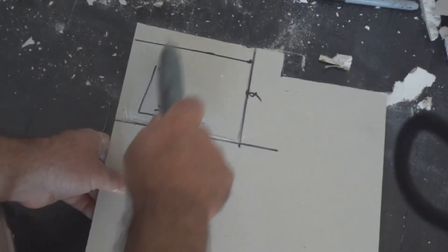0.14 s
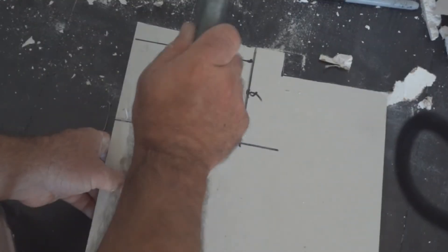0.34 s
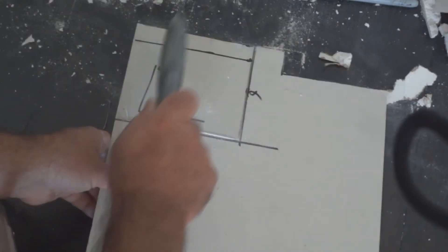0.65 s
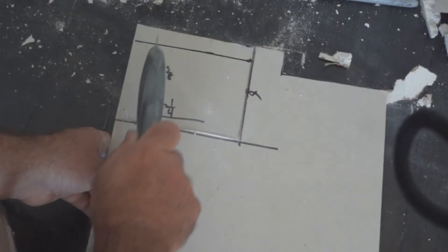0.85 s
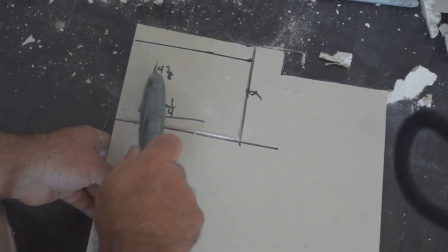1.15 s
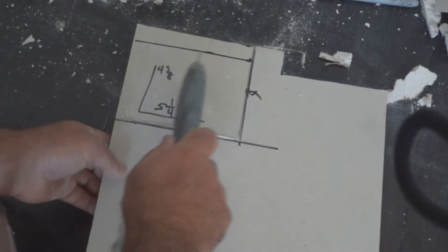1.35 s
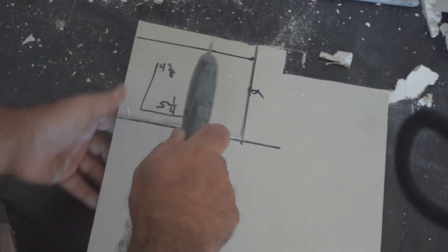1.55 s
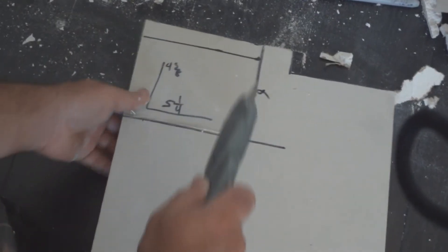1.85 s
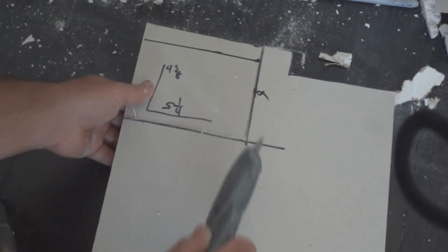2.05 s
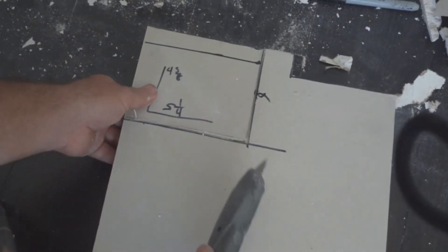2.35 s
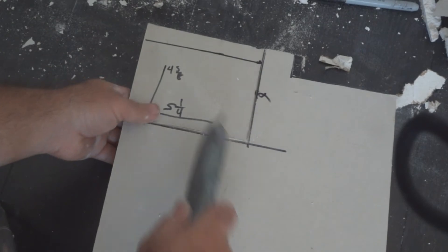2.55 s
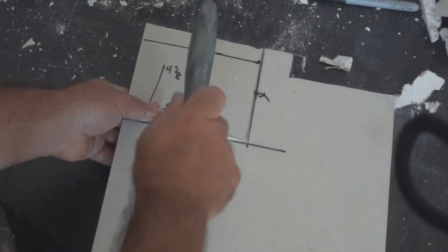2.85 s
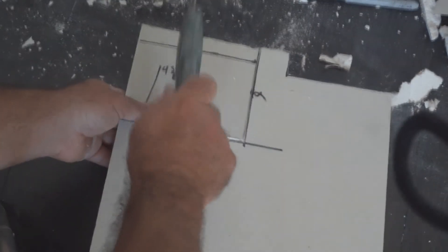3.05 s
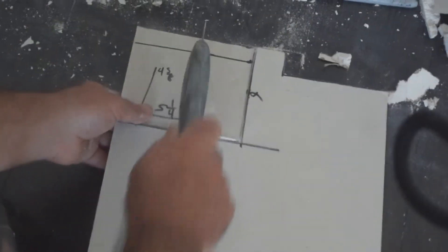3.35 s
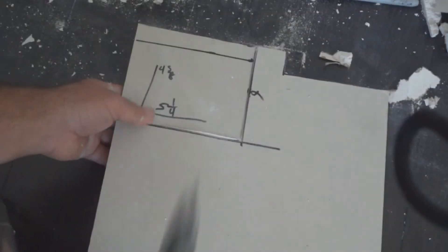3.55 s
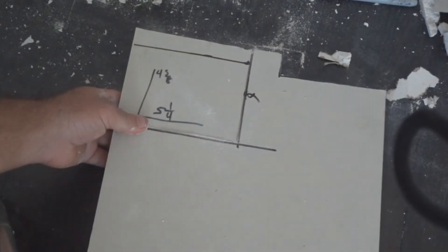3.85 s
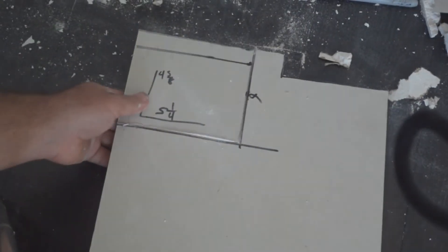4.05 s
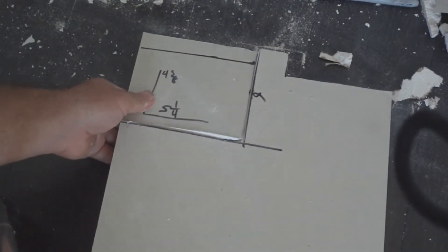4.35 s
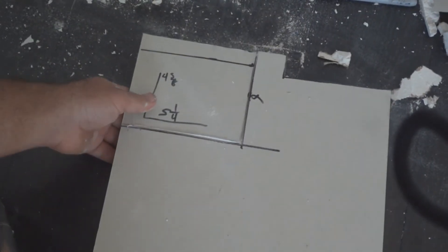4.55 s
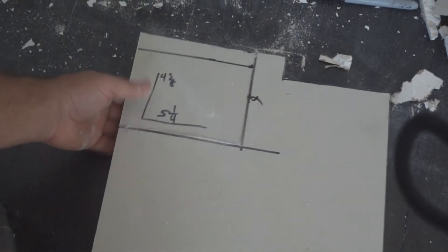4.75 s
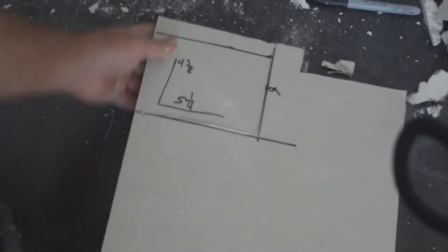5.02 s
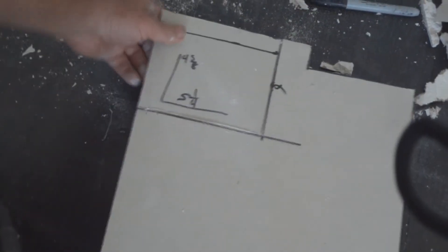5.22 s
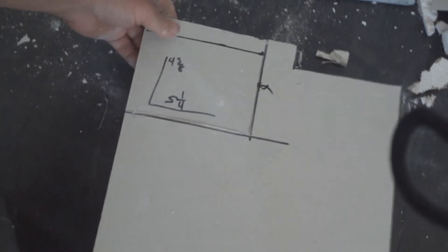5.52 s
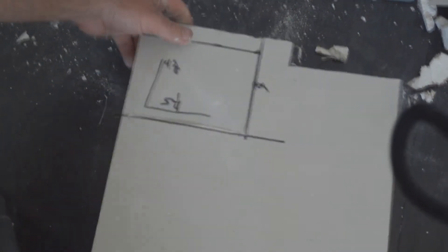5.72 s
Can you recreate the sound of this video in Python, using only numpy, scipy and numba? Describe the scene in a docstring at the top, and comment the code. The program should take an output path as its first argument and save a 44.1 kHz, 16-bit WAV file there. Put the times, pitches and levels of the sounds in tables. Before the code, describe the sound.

A knife handle knocks on a scored plasterboard sheet in a bare, echoing workshop. The ring of one blow is already fading as another lands. Faint grit ticks, skin brushing paper and small creaks from the grip follow, then two more sharp knocks close together. A hand slides over the sheet and bends it, giving soft bumps and a quick cluster of cracks. The handling sounds are close and dry, while the knocks fill the room.

```python
"""Rapping and cracking plasterboard

A knife handle raps a scored plasterboard sheet four times in a bare, echoing workshop, the first blow
landing just before the start. Grit ticks, skin brushes the paper and the knife creaks in the grip; then
a hand slides over the sheet and bends it until it knocks and cracks. A limiter squashes every blow and
lets the echo swell up behind it."""
import sys
import numpy as np
from scipy import signal
from scipy.fft import rfft, irfft, next_fast_len
from scipy.io import wavfile
from scipy.ndimage import uniform_filter1d, minimum_filter1d
from numba import njit

SR = 44100
rng = np.random.default_rng(int(sys.argv[2]) if len(sys.argv) > 2 else 0)


def to_wav(s):
    """Save 16-bit WAV."""
    ch = np.atleast_2d(s).T  # columns
    pcm = np.round(np.clip(ch, -1, 1) * 32767)  # PCM
    wavfile.write(sys.argv[1], SR, pcm.astype(np.int16))


N = 259308

# Handle blows. Each row: start in seconds, strength in dB, low, bite and bright lifts in dB, thud and
# direct sound in dB against the strength, pitch factor, landing spot (-1 on the nodes, 1 between them).
HANDLE_RAPS = [(-.12, 14, 7, -5, 3.5, -31.5, 12, 0.96, 0.9),
               (.5545, 12, 0.5, 0.5, -2.5, -32.5, 1, 0.97, -0.13),
               (3.0117, 19.5, -8, -1.5, 2, -39, 4, 0.97, 0.98),
               (3.336, 13.5, 8, -7.5, 7, -32, 17.5, 1, 0.82)]
# The ring of the rapped sheet. Each row: pitch in Hz, width in Hz, level in dB.
RAPPED_MODES = [(404, 86, -12.5), (463, 250, -12.5), (698, 230, -7.5), (971, 120, 0.5), (1144.6, 69, -1),
                (1347, 330, -7), (1822, 194, -3), (2250, 900, -12), (3060, 710, -9.5), (3600, 500, -10.5),
                (4550, 870, -15.5), (5347, 320, -17.5), (6384, 380, -21.5), (8400, 4200, -26.5),
                (8650, 440, -23), (9310, 380, -24.5), (11200, 8200, -22.5), (13430, 2000, -32.5)]
# Modes that follow the landing spot. Each row: pitch in Hz, lift between the nodes in dB.
LANDING_MODES = [(686, 6.5), (1128, -2), (1362, -2), (1812, -2.5), (2336, 4), (3564, -0.6), (5300, -0.8),
                 (6370, 2), (9310, 6.5)]
# Knocks and cracks of the bent sheet. Each row: as for the handle blows, without the landing spot.
BEND_CRACKS = [(5.374, -21.5, 0.5, 10, -9, -36, 25.6, 1.0), (5.398, -18, 3.5, -8.5, -13, -20, 26.8, 1.02),
               (5.44, -17, 1.5, 2.5, -6.5, -21, 23.9, 1.04), (5.565, -17, 17.5, -4, -14.5, -32, 32.8, .99),
               (5.596, -13.5, 3, 3, 8.5, -22, 26.5, 1.0), (5.618, -17.5, -3, 2.5, 14, -33, 24.7, 1.02),
               (5.655, -14.5, -4, 1.5, -0.5, -33, 23.6, 1.105), (5.69, -18.5, -10.5, 2, 12, -16, 22, 1.0),
               (5.745, -19, 2.5, -8, 5, -12, 30.8, 0.86)]
# The ring of the loosely held sheet. Each row: pitch in Hz, width in Hz, level in dB.
LOOSE_MODES = [(131, 30, -14), (226.6, 30, -4), (372, 27, -23), (484, 49, 11), (617, 370, 6),
               (747, 220, -17.5), (820, 280, -2.5), (1570, 600, -7.5), (2040, 87, -6.5), (2900, 130, -22),
               (3660, 900, -6.5), (5005, 1500, -20.5), (6360, 1800, -20.5), (8850, 380, -23),
               (10550, 550, -23), (12280, 2800, -28.5)]
# Soft bumps on the bench. Each row: start in seconds, level in dB, pitch in Hz, seconds to fall 60 dB.
BENCH_BUMPS = [(1.64, -65, 87, 0.21), (2.351, -41, 84, 0.21), (5.015, -41, 694, 0.17),
               (5.062, -19.5, 745, 0.027), (5.066, -37, 85, 0.094), (5.153, -31, 84, 0.17),
               (5.262, -43.5, 91, 0.41), (5.401, -27.5, 214, 0.19), (5.572, -28, 216, 0.41),
               (5.745, -19, 298, 0.25)]
# Grit and handling ticks. Each row: start in seconds, level in dB, centre in Hz, relative ring in dB.
GRIT_TICKS = [(1.508, -54.5, 9800, -4), (1.807, -41.5, 8490, -10), (1.814, -38.5, 8100, -10),
              (2.0754, -53, 4430, -1), (2.208, -58.5, 3520, 1.5), (2.318, -61, 3040, 4),
              (2.344, -54.5, 4490, 3), (2.577, -58, 8000, 4), (2.937, -56.5, 13400, -11),
              (4.16, -54, 4980, 3), (4.228, -43.5, 4800, -12.5), (4.39, -51.5, 5640, -16),
              (4.452, -48, 8570, -10.5), (4.481, -55.5, 9100, -3.5), (4.776, -61, 4450, 0),
              (5.303, -47, 12400, -3)]
# The hand's long slide. Each row: time in seconds, hiss level in dB, drag against the hiss in dB.
HAND_SLIDE = [(4.84, -69, 2), (4.91, -47, -10), (4.965, -50.5, -8.5), (4.995, -47, -7.5),
              (5.03, -53.5, 3.5), (5.135, -51.5, -1), (5.172, -46.5, -4), (5.2, -51, -8), (5.29, -55, -5),
              (5.31, -50, -6), (5.37, -55, -1)]
# Skin and cloth brushing paper. Each row: crest time in seconds, hiss level in dB, drag against the
# hiss in dB, swell in seconds, fade in seconds.
PAPER_BRUSHES = [(1.67, -60, -9, 0.12, 0.14), (1.83, -59, -19, 0.026, 0.083),
                 (1.955, -57, -5.5, 0.14, 0.066), (2.082, -60, -14, .015, .04),
                 (2.21, -66, -6, 0.019, 0.055), (2.35, -59.5, 1.5, 0.039, 0.11),
                 (2.586, -61.5, 0, 0.13, 0.12), (2.9, -70.5, -7, 0.25, 0.056),
                 (4.24, -52, -23, 0.048, 0.13), (4.39, -65.5, -12, .08, .05), (4.49, -65, -12, 0.036, 0.12),
                 (4.62, -65.5, 6, 0.17, .1), (4.775, -59.5, 1, .04, 0.091)]
# The colour of rubbed paper. Each row: frequency in Hz, level in dB.
RUB_COLOUR = [(120, -5.5), (200, -5.5), (245, -11), (538, -5.5), (1320, -8), (1530, -5), (1940, -8.5),
              (4520, -1.5), (4860, -4), (12600, -10.5), (16000, -16)]
# The knife creaking in the hand. Each row: start in seconds, level in dB, pitch in Hz, half its length
# in seconds.
GRIP_CREAKS = [(1.628, -53.5, 3150, 0.12), (1.65, -59, 2590, 0.11), (1.653, -55, 3450, 0.079),
               (2.299, -56, 936, .1), (2.343, -55, 3600, .03), (2.35, -60, 1450, .06),
               (2.527, -58.5, 966, 0.11), (2.573, -58.5, 1520, 0.079), (2.565, -64.5, 4490, 0.081),
               (4.872, -56, 4580, 0.19), (5.14, -55, 4300, .1), (5.165, -44, 1150, 0.054)]
# The workshop's decay. Each row: frequency in Hz, seconds to fall 60 dB.
ROOM_DECAY = [(100, 0.74), (300, 0.48), (560, 0.53), (740, 0.66), (880, 0.87), (1200, 0.93), (1450, 0.94),
              (1780, 0.95), (2100, 0.86), (2600, 0.68), (3500, 0.7), (6000, 0.64), (10000, 0.44),
              (15000, 0.34)]
# The echo's width. Each row: frequency in Hz, side against mid in dB.
ROOM_WIDTH = [(60, -20.5), (130, -16), (290, -23), (640, -17), (1410, -10), (3100, -12.5), (6820, -11),
              (15000, -25)]
# The room's strongest standing waves. Each row: pitch in Hz, relative level in dB, seconds to fall 60 dB.
STANDING_WAVES = [(760, -8, 0.27), (906, -9, .9), (922, -3.5, .85), (965, 0.5, 0.86), (1137, -3.5, .9),
                  (1202, -1.5, 0.35), (1269, -5, 1), (1508, 0, 0.94), (1720, 1, 0.18), (1776, -1.5, 1.05),
                  (1810, -5, 0.67), (1852, -2.5, 1)]
# The colour of the room tone. Each row: frequency in Hz, relative level in dB.
ROOM_TONE_COLOUR = [(15, -18.5), (34, -6), (44, 6.5), (56, -8), (70, -7), (125, -3.5), (180, -7.5),
                    (300, -13), (700, -15.5), (1000, -13.5), (1800, -18.5), (4000, -24.5), (8000, -29.5),
                    (16000, -24.5)]
# The stereo lean. Each row: frequency in Hz, left over right in dB.
STEREO_LEAN = [(60, -0.5), (240, 3), (950, -0.5), (3770, 0), (15000, 0.5)]

LEAD = SR // 4  # samples of run-up before the start
LOW_HZ, BITE_HZ, BRIGHT_HZ, THUD_HZ = 614, 3180, 5900, 85
TICK_RISE_S, TICK_FADE_S = 0.0021, 0.0081
BRUSH_RANGE_DB = 17  # a brush's swell and fade span this much
STANDING_DB, ROOM_TONE_DB = -29, -61.5


def sheet_blows(blows, modes, cut_hz):
    """Each blow rings every mode of the sheet; returns the room send and the direct sound."""
    send, direct = np.zeros((2, N + LEAD))
    t = np.arange(16384) / SR
    f = np.fft.rfftfreq(len(t), 1 / SR)
    hz, width, db = np.transpose(modes)[:, :, None]
    low_cut = 1 / (1 + (cut_hz / (f + 1)) ** 8)  # a sheet radiates little below its first modes
    spot_db = sum(lift * (abs(hz / mode_hz - 1) < .06) for mode_hz, lift in LANDING_MODES)
    for start, strength_db, low_db, bite_db, bright_db, thud_db, direct_db, pitch, *spot in blows:
        lift_db = low_db / (1 + (hz / LOW_HZ) ** 4) + bright_db / (1 + (BRIGHT_HZ / hz) ** 3)
        lift_db += sum(spot) * spot_db + bite_db * np.exp(-(np.log(hz / BITE_HZ) / 0.12) ** 2)
        power = gain_of(2 * (db + lift_db)) / (1 + (2 * (f - hz * pitch) / width) ** 2) ** 1.5
        ring = struck_response(np.sqrt(power.sum(0) * low_cut))
        ring = gain_of(strength_db) * ring / np.linalg.norm(ring)
        # the gypsum crumbles, smearing the direct sound over a few milliseconds
        crumble = rng.choice([-1., 1.], size=800) * (rng.random(size=800) < .15)
        crumble *= np.exp(-t[:800] / 0.0042)
        crumble[0] = 1
        crunch = signal.oaconvolve(ring, crumble / np.linalg.norm(crumble))[:len(t)]
        thud_envelope = gain_of(strength_db + thud_db - 60 * t / .5) * np.minimum(t / 0.022, 1)
        thud = thud_envelope * noise_band(len(t), THUD_HZ, width_hz=30)
        add(send, start, ring)
        add(direct, start, gain_of(direct_db) * crunch + thud)
    return send, direct


def bench_bumps():
    """The sheet hums with three loose partials when it touches the bench."""
    out, t = np.zeros(N + LEAD), np.arange(SR // 2) / SR
    for start, db, hz, t60 in BENCH_BUMPS:
        phase = 2 * np.pi * hz * t
        hum = np.sin(phase) + 0.41 * np.sin(1.4 * phase) + 0.53 * np.sin(0.72 * phase)
        attack = np.minimum(t / t60 / 0.095, 1)
        add(out, start, gain_of(db - 60 * t / t60) * attack * hum)
    return out


def grit_ticks():
    """Grit gives short scratchy bursts, part of each ringing at its centre pitch."""
    out, t = np.zeros(N + LEAD), np.arange(2048) / SR
    envelope = np.minimum(t / TICK_RISE_S, 1) * np.exp(-t / TICK_FADE_S)
    for start, db, hz, ring_db in GRIT_TICKS:
        colour = [(hz / 6, -20), (hz / 2, -6), (hz, 0), (hz * 3, -6)]
        scratch = unit_rms(equalise(rng.standard_normal(len(t)), colour))
        ring = gain_of(ring_db) * noise_band(len(t), hz, width_hz=0.063 * hz)
        add(out, start, gain_of(db) * (scratch + ring) * envelope)
    return out


def paper_rubs():
    """Skin and cloth on paper: uneven grains make a bright hiss and a dull drag in every stroke."""
    t = (np.arange(N + LEAD) - LEAD) / SR
    coarse_t = t[::32]
    times, slide_db, slide_drag_db = np.transpose(HAND_SLIDE)
    hiss_gain = gain_of(np.interp(coarse_t, times, slide_db, left=-150, right=-150))
    drag_gain = hiss_gain * gain_of(np.interp(coarse_t, times, slide_drag_db))
    for crest, db, drag_db, swell, fade in PAPER_BRUSHES:
        from_crest = np.maximum((crest - coarse_t) / swell, (coarse_t - crest) / fade)
        stroke = gain_of(db - BRUSH_RANGE_DB * from_crest)
        hiss_gain = np.hypot(hiss_gain, stroke)
        drag_gain = np.hypot(drag_gain, gain_of(drag_db) * stroke)
    noise = rng.standard_normal(len(t))
    grain_db = 1.7 * unit_rms(uniform_filter1d(rng.standard_normal(len(t)), 130))
    rub = equalise(noise * gain_of(grain_db), RUB_COLOUR)
    drag = signal.sosfiltfilt(signal.butter(2, 2000, fs=SR, output="sos"), rub)
    hiss = unit_rms(rub - drag)
    return np.interp(t, coarse_t, hiss_gain) * hiss + np.interp(t, coarse_t, drag_gain) * unit_rms(drag)


def grip_creaks():
    """The knife creaks in the hand: faint, narrow, noisy tones that swell fast and fade."""
    out = np.zeros(N + LEAD)
    for start, db, hz, half_length in GRIP_CREAKS:
        progress = np.linspace(0, 1, 2 * round(half_length * SR))
        envelope = np.minimum(progress / 0.093, 1) * np.exp(-3 * progress) * (1 - progress)
        add(out, start, gain_of(db) * noise_band(len(progress), hz, width_hz=140) * envelope)
    return out


def workshop_echo(send):
    """A dense echo with standing waves, each band dying at its own speed; a weaker tail widens it."""
    hz, frame_t, bands = signal.stft(rng.standard_normal((2, 2 * SR)), SR, nperseg=512)
    bands *= gain_of(-60 * frame_t / curve_at(ROOM_DECAY, hz)[:, None])
    bands[1] *= gain_of(curve_at(ROOM_WIDTH, hz))[:, None]
    tail = signal.istft(bands, SR, nperseg=512)[1]
    t = np.arange(tail.shape[1]) / SR
    for wave_hz, db, t60 in STANDING_WAVES:
        wave = np.sin(2 * np.pi * (wave_hz * t + rng.random()))
        tail[0] += gain_of(STANDING_DB + db - 60 * t / t60) * wave
    tail *= 1 - np.exp(-t / 0.0074)  # the echo builds up
    mid, side = signal.fftconvolve(send[None], tail, axes=1)[:, :len(send)]
    return np.array([mid + side, mid - side])


def room_tone():
    """A steady bed of air, distant hum and hiss."""
    mid, side = equalise(rng.standard_normal((2, N)), ROOM_TONE_COLOUR)
    return gain_of(ROOM_TONE_DB) * unit_rms(np.array([mid + 0.22 * side, mid - 0.23 * side]))


def gain_of(db):
    """Decibels to a factor."""
    return 10 ** (np.asarray(db) / 20)


def unit_rms(x):
    """Scales to rms 1."""
    return x / np.sqrt(np.mean(x ** 2) + 1e-20)


def curve_at(points, hz):
    """Reads a curve on a log-frequency axis."""
    f, value = np.transpose(points)
    return np.interp(np.log(hz + 1), np.log(f + 1), value)


def add(track, start, sound):
    """Lays a sound in at its start in seconds, on a track that begins LEAD samples early."""
    part = track[round(start * SR) + LEAD:][:len(sound)]
    part += sound[:len(part)]


def equalise(x, points):
    """Colours a sound with a curve in dB."""
    size = next_fast_len(x.shape[-1])
    gain = gain_of(curve_at(points, np.fft.rfftfreq(size, 1 / SR)))
    return irfft(rfft(x, size) * gain, size)[..., :x.shape[-1]]


def struck_response(spectrum):
    """A ring that starts at once and has the given spectrum (minimum phase)."""
    log_gain = np.log(np.concatenate([spectrum, spectrum[-2:0:-1]]) + 1e-6)
    return np.fft.ifft(np.exp(np.conj(signal.hilbert(log_gain)))).real


def noise_band(size, hz, width_hz):
    """Noise gathered around one pitch."""
    f = np.fft.rfftfreq(size, 1 / SR)
    return unit_rms(irfft(rfft(rng.standard_normal(size)) / (1 + (2 * (f - hz) / width_hz) ** 2), size))


@njit
def release(level_db, fall_s):
    """Follows rises at once and falls back exponentially."""
    out, keep = level_db.copy(), np.exp(-1 / (fall_s * SR))
    for i in range(1, len(out)):
        out[i] = max(out[i], out[i - 1] * keep)
    return out


def limiter(dry):
    """Ducks loud sounds just ahead of time; a big jump clamps too hard at first and lets go quickly."""
    power = uniform_filter1d((dry ** 2).mean(0), size=61)
    peak_ahead = -minimum_filter1d(-power, size=181, origin=-90)  # looks 4 ms ahead
    over_db = np.maximum(10 * np.log10(abs(peak_ahead) + 1e-12) + 6, 0)  # threshold at -6 dB
    recent_db = uniform_filter1d(over_db, size=2205, origin=1102)  # the last 50 ms
    jump_db = np.maximum(over_db - recent_db, 0)
    over_db[0] += 3.5  # still clamped from the blow just before the start
    cut_db = 1.059 * release(over_db, fall_s=.22) + 0.43 * release(jump_db, fall_s=.07)
    return dry / gain_of(uniform_filter1d(cut_db, size=25))


def scene():
    """Loud blows fill the room; the small handling sounds stay close and drier."""
    rap_send, raps = sheet_blows(HANDLE_RAPS, RAPPED_MODES, cut_hz=273)
    crack_send, cracks = sheet_blows(BEND_CRACKS, LOOSE_MODES, cut_hz=81)
    scratchy = grit_ticks() + paper_rubs()
    pitched = bench_bumps() + grip_creaks()
    send = rap_send + crack_send + gain_of(-40) * scratchy + gain_of(-43.5) * pitched
    mix = raps + cracks + scratchy + pitched + workshop_echo(send)
    # a faint copy, 1.4 ms late and flipped in the right channel, widens the close sounds
    widening = gain_of(-15) * np.roll(scratchy + raps + cracks, SR // 700)
    mix += np.array([widening, -widening])
    return mix[:, LEAD:] + room_tone()


def record(dry):
    """The master chain: limiter, a slight stereo lean and a low-pass at 15.5 kHz."""
    left, right = limiter(dry)
    left = equalise(left, [(hz, db / 2) for hz, db in STEREO_LEAN])
    right = equalise(right, [(hz, -db / 2) for hz, db in STEREO_LEAN])
    low_pass = signal.firwin(255, 15500, window=("kaiser", 9), fs=SR)
    return signal.oaconvolve(np.array([left, right]), low_pass[None], "same")


dry = scene()
out = record(dry)
to_wav(out)
```